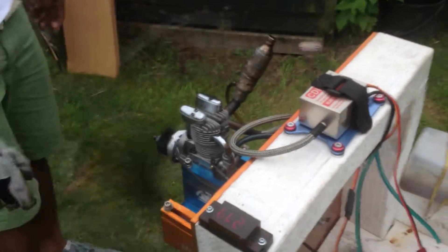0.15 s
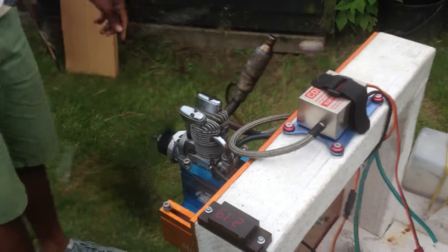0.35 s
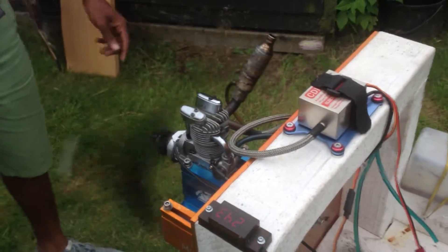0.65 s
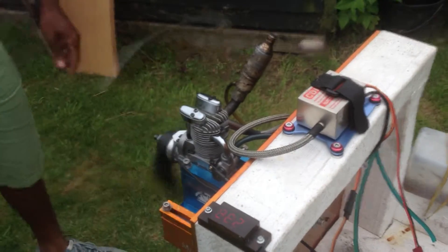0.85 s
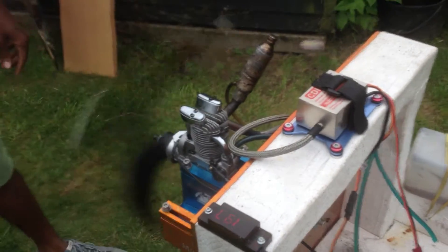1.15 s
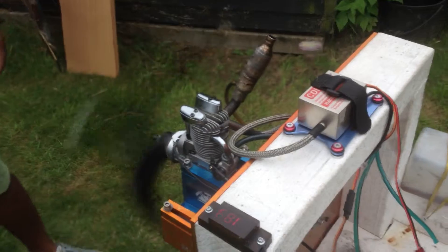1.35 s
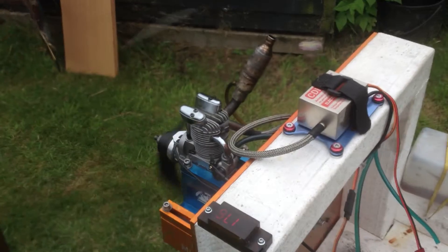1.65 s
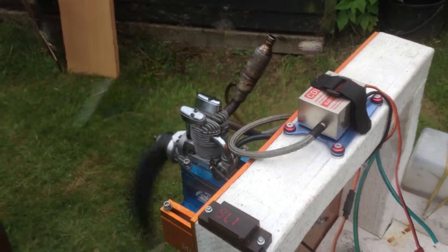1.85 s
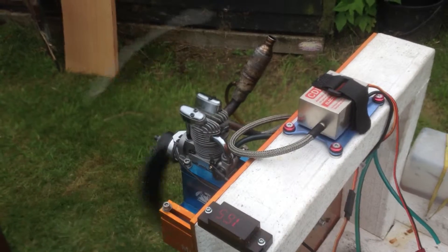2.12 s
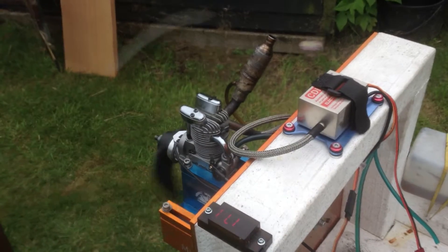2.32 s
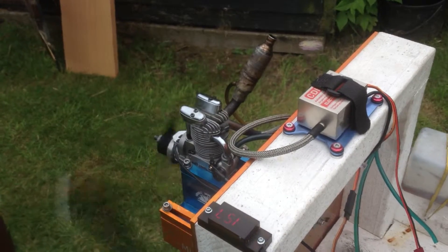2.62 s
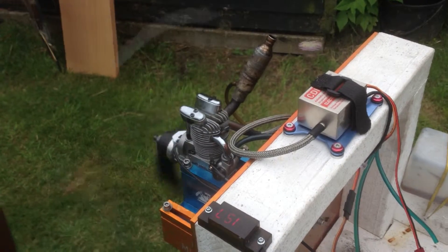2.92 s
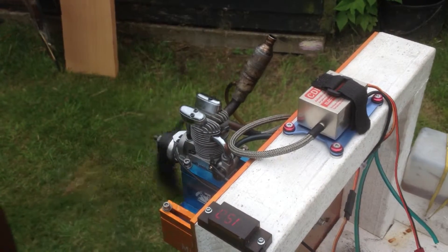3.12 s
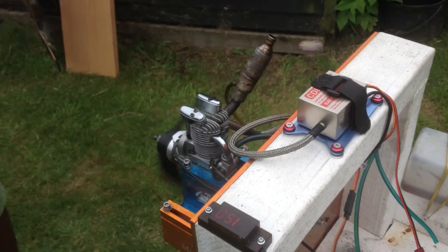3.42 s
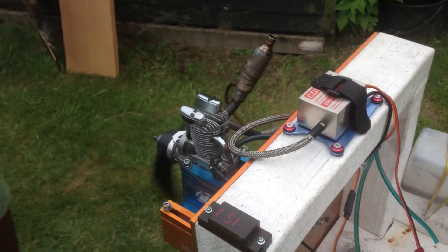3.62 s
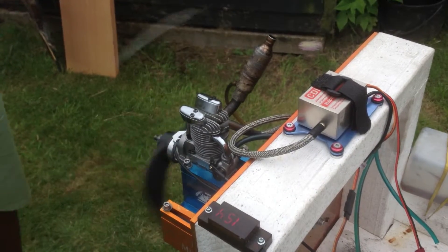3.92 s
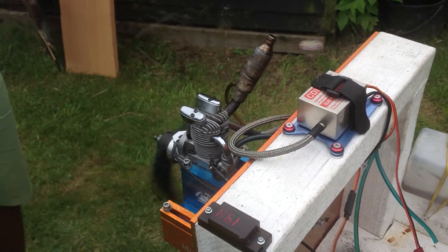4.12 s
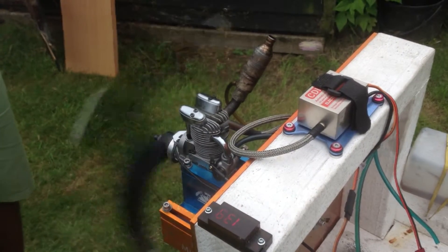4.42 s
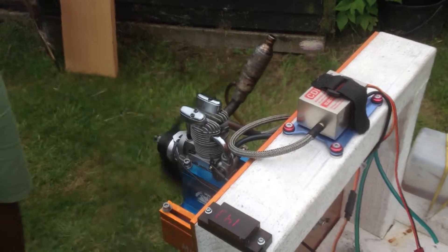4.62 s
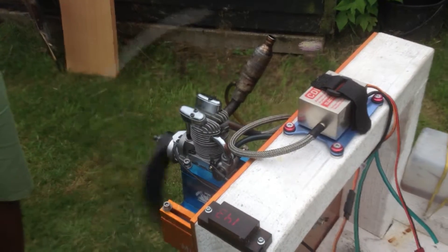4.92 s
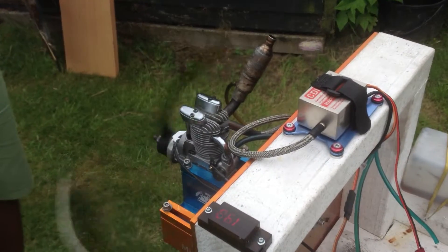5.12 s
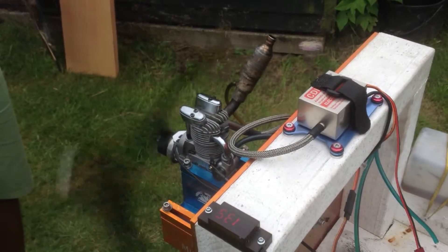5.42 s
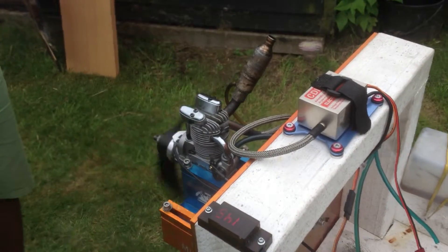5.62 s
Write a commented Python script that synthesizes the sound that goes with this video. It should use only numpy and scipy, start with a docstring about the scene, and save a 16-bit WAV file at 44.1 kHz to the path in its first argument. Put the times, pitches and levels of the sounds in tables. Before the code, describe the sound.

A small four-stroke model engine with a propeller runs on a garden stand, very close to the microphone. It begins already firing quickly for about a third of a second, then drops to a slow idle of separate hollow putts, gradually slowing further. Valve gear ticks between firings, the intake gulps softly, and propeller wash rumbles and thumps irregularly on the microphone.

```python
"""A small single-cylinder four-stroke model engine putts close to the microphone on a garden test stand.
After a short fast run it drops to a very slow idle: every firing sends a pulse through the exhaust tones,
with a pop, hiss and rush of noise, and the intake gulps half a cycle later. Valve gear ticks and rings
the metal parts. Filtered noise makes the stirred air and the gusts of propeller wash; short pulses make
thumps, one close pair probably a backfire. Faint echoes of the engine come back from the garden."""
import sys
import numpy as np
from scipy import signal
from scipy.fft import rfft, irfft
from scipy.io import wavfile
from scipy.ndimage import uniform_filter1d

SR = 44100
rng = np.random.default_rng(int(sys.argv[2]) if len(sys.argv) > 2 else 0)


def store_pcm(level_fs):
    """Save levels as 16-bit WAV."""
    pcm = np.round(np.clip(level_fs, -1, 1) * 32767).astype(np.int16)
    wavfile.write(sys.argv[1], SR, np.atleast_2d(pcm).T)


N = 254016  # length in samples
TIME = np.arange(N) / SR
TOP_HZ = 15350  # highest pitch that gets through
IDLE_CYCLE_S = 0.15  # time between firings that counts as speed 1


def undb(db):
    """Turn decibels into a plain multiplier."""
    return 10 ** (np.asarray(db) / 20)


def unit(x):
    """Scale a sound to an average strength (rms) of 1."""
    return x / np.sqrt(np.mean(x ** 2))


def even_out(x, window_s):
    """Divide a sound by its own strength over a short window, so that its level stays steady."""
    return x / np.sqrt(uniform_filter1d(x ** 2, int(window_s * SR)))


def add(out, s, sound):
    """Mix a sound in from time s on."""
    start = int(s * SR)
    lo, hi = max(start, 0), min(start + len(sound), N)
    if hi > lo:
        out[lo:hi] += sound[lo - start:hi - start]


def noise(spectrum):
    """Random noise of rms 1, coloured by a table of f/Hz, level/dB."""
    hz, db = np.transpose(spectrum)
    bins = np.arange(N // 2 + 1) * SR / N
    colour_db = np.interp(np.log(bins + 1), np.log(hz), db)
    return unit(irfft(rfft(rng.standard_normal(N)) * undb(colour_db), N))


def resonate(x, modes):
    """Let a sound excite several tones at once: f/Hz, width/Hz, level/dB."""
    out = 0
    for hz, width, db in modes:
        out = out + undb(db) * signal.lfilter(*signal.iirpeak(hz, hz / width, SR), x)
    return out


def low_cut(x, hz):
    """Thin out what lies below hz (second-order high-pass)."""
    return signal.sosfilt(signal.butter(2, hz, "high", fs=SR, output="sos"), x)


def walk(rate):
    """Smooth random wander with a spread of 1, taking a new value `rate` times a second."""
    k = int(SR / rate)
    steps = np.repeat(rng.standard_normal(N // k + 1), k)
    return unit(uniform_filter1d(steps, k)[:N])


def bumps(times, sizes, widths):
    """Bell-shaped pulses centred on the given times; widths in s."""
    out = np.zeros(N)
    for s, size, width in np.broadcast(times, sizes, widths):
        lo, hi = np.searchsorted(TIME, [s - 6 * width, s + 6 * width])
        out[lo:hi] += size * np.exp(-((TIME[lo:hi] - s) / width) ** 2 / 2)
    return out


def decays(times, sizes, decay_s):
    """Envelopes that jump up at the given times and die away."""
    out = np.zeros(N)
    shape = np.exp(-np.arange(int(8 * decay_s * SR)) / (decay_s * SR))
    for s, size in zip(times, sizes):
        add(out, s, size * shape)
    return out


def by_speed(law, speed):
    """Level in dB of a sound that grows with crank speed."""
    idle_db, doubling_db = law
    return idle_db + doubling_db * np.log2(speed)


# tones of the exhaust pipe: f/Hz, width/Hz, level/dB
EXHAUST_TONES = [(181.2, 57.5, -3), (299.3, 106.4, -0.5), (518.8, 40, -9), (1334, 1220, -5.5)]
# colour of the rush of burnt gas: f/Hz, level/dB
RUSH_COLOUR = [(150, -32), (350, -6), (600, 1), (900, 1), (1250, -5), (1700, -22), (3000, -22),
               (8000, -40.5)]
# starting level of the exhaust pulse: at idle level/dB, more per doubling of speed level/dB
PULSE_LAW = (-19, 2.08)
# starting level of the gas hiss: at idle level/dB, more per doubling of speed level/dB
HISS_LAW = (-45.5, 0.38)


def exhaust(times, periods, firing_speed):
    """The valve cracks open with a pop, gas hisses through the gap, then the main pulse leaves the pipe."""
    level_chance = rng.standard_normal((len(times), 2)).T  # no two cycles burn alike
    pulse_db = by_speed(PULSE_LAW, firing_speed) + 0.5 * level_chance[0]
    hiss_db = by_speed(HISS_LAW, firing_speed) + 1.2 * level_chance[1]
    lead = 0.002728 + 0.0127 * periods  # a slow crank opens the valve more slowly
    chance = rng.standard_normal((len(times), 2)).T
    pulses = bumps(times, undb(pulse_db + 9.5), 0.00039 * np.exp(0.025 * chance[0]))
    putt = resonate(pulses, EXHAUST_TONES)
    cracks = bumps(times - lead, undb(pulse_db - 2.5), 0.00013)
    pop = resonate(cracks, [(550, 300, 1.5), (1410, 180, -21)])
    # the burnt gas follows as a turbulent rush, stronger at speed
    flow = undb(pulse_db - 23.5) * (IDLE_CYCLE_S / periods) ** 0.44
    rush_shape = uniform_filter1d(decays(times, flow, 0.0069), int(0.009 * SR))
    rush = rush_shape * noise(RUSH_COLOUR)
    # the kick of each firing sets the stand humming a moment later
    kicks = bumps(times + 0.008445 + 0.00035 * chance[1], undb(pulse_db + 11), 0.00059)
    stand = resonate(kicks, [(581.7, 38, 1.0), (381.0, 18, -22.0)])
    pipe = putt + pop + rush + stand + jet(times, lead, hiss_db)
    return low_cut(pipe, hz=141)  # so small a pipe radiates little bass


# basic colour of the squeezed gas: f/Hz, level/dB
GAS_COLOUR = [(800, 7.5), (1800, 17), (2600, 1.5), (3500, 8.5), (5000, -4), (7000, 1), (9000, -0.5),
              (11000, -2), (14500, 8)]


def jet(times, lead, hiss_db):
    """Gas squeezed through the barely open valve hisses, each time with its own shrill colour."""
    out, size = np.zeros(N), 1024
    t = (np.arange(size) - size / 2) / SR
    hz = np.fft.rfftfreq(size, 1 / SR)
    gas_hz, gas_db = np.transpose(GAS_COLOUR)
    for s, gap, db in zip(times, lead, hiss_db):
        chance = rng.standard_normal(size=20)
        own_colour = np.interp(hz, np.linspace(0, SR / 2, len(chance)), chance)
        colour_db = np.interp(hz, gas_hz, gas_db) + 3 * own_colour
        gas = unit(irfft(rfft(rng.standard_normal(size)) * undb(colour_db) * (hz < TOP_HZ)))
        # a sharp peak on a weaker, longer spread; silent until half the gap before the peak
        squeeze = np.exp(-np.abs(t) / 0.00096) + undb(-16.5) * np.exp(-np.abs(t) / 0.0079)
        add(out, s - 0.5 * gap + t[0], undb(db + 1.5) * gas * squeeze * (t > -0.5 * gap))
    return out


# colour of the rushing intake air: f/Hz, level/dB
GULP_COLOUR = [(60, -24), (130, -2.5), (200, 9.5), (320, 13), (450, -2), (800, -10), (1300, -21.5),
               (2500, -69)]
# starting level of the gulp: at idle level/dB, more per doubling of speed level/dB
GULP_LAW = (-39.5, 3.5)


def intake(times, periods, firing_speed):
    """Half a cycle after each firing the carburettor gulps air: a soft suck and a short rush."""
    gulp_db = by_speed(GULP_LAW, firing_speed) + 2.0 * rng.standard_normal(len(times))
    at = times + periods * (0.48 + 0.0093 * rng.standard_normal(len(times)))
    pulls = bumps(at, -undb(gulp_db + 14), 0.00063)  # suction, so the pulses point downwards
    suck = resonate(pulls, [(163.6, 30, -0.98), (335.0, 42, -1.3)])
    rush = even_out(noise(GULP_COLOUR), 0.017)  # each gulp keeps its own strength
    return suck + bumps(at, undb(gulp_db - 0.5), 0.032 * periods) * rush


# knocks of valve gear and piston in every cycle: share of the cycle after the firing, level/dB
KNOCKS = [(.08, 1), (0.147, 8), (0.257, 6), (0.418, 7.5), (0.554, 0.5), (0.627, 5.5), (0.763, 4)]
# ringing of cylinder, rockers and stand: f/Hz, width/Hz, level/dB
METAL_TONES = [(603, 35, 11), (950, 140, -15), (1205, 22.5, 7.5), (1492, 35, -2.5), (2036, 77, 0.3),
               (2354, 41, 2), (2690, 24, -16.5), (3060, 160, -13.5), (5240, 1300, -17.5), (7800, 84, -24)]
# colour of the rubbing parts: f/Hz, level/dB
RUB_COLOUR = [(200, 10), (600, 17.5), (1200, 4.5), (2400, 1.5), (2900, -18.5), (5500, -10), (8000, -29),
              (10500, -52), (14500, -20)]
# colour of the oiled surfaces: f/Hz, level/dB
OIL_COLOUR = [(1000, 0), (6500, -4.5), (10500, -8), (14500, -3)]
# overall level of knocks and rubbing: at idle level/dB, more per doubling of speed level/dB
CLATTER_LAW = (-60.5, 3.8)


def mechanism(times, periods, speed):
    """Knocks at nearly fixed crank angles ring the metal; cams and piston rub twice a cycle."""
    share, knock_db = np.transpose(KNOCKS)
    chance = rng.standard_normal((len(times), 2, len(KNOCKS)))
    at = times[:, None] + periods[:, None] * (share + 0.008 * chance[:, 0])
    blows = bumps(at.ravel(), undb(knock_db + 1.3 * chance[:, 1]).ravel(), 0.00003)
    blows /= np.sqrt(speed)  # crowded knocks share their energy
    ring = unit(resonate(blows, [mode for mode in METAL_TONES if mode[0] > 1000]))
    # count of cycles so far, with the part after the point showing how far the current one has got
    cycle = np.interp(TIME, np.append(times, times[-1] + periods[-1]), np.arange(len(times) + 1))
    # compression slows the crank, so the rubbing falls quiet just before each firing
    hush_db = -5 * np.exp(-((cycle % 1 - 0.91) / 0.07) ** 2)
    sliding = undb(hush_db + 2.5 * np.cos(4 * np.pi * (cycle - 0.16)) + 2.3 * walk(200))
    rubbed_metal = unit(resonate(rng.standard_normal(N), METAL_TONES))
    rub = sliding * (noise(RUB_COLOUR) + undb(-9) * rubbed_metal)
    # fine hiss of oiled surfaces
    oil = undb(-74.6 + 3.6 * np.cos(4 * np.pi * (cycle - 0.19))) * noise(OIL_COLOUR)
    return undb(by_speed(CLATTER_LAW, speed)) * (undb(-5.0) * ring + rub) + oil


def crank_speed(times, periods):
    """Speed as a multiple of idle; the heavy propeller makes it lag behind the firing rate."""
    coast_s = 0.44  # time constant of the lag
    rate = np.interp(TIME, times, IDLE_CYCLE_S / periods)
    keep = np.exp(-1 / (coast_s * SR))
    return rate[0] + signal.lfilter([1 - keep], [1, -keep], rate - rate[0])


# gusts of propeller wash on the microphone: start t/s, strongest t/s, end t/s, level/dB
GUSTS = [(0.288, 0.427, 0.56, -28.5), (0.633, 0.63, 0.93, -35), (1.856, 2, 2.22, -32.5),
         (2.3, 2.32, 2.51, -32), (2.795, 2.997, 3.19, -35.5), (3.24, 3.272, 3.6, -39.5),
         (4.922, 5.04, 5.08, -39), (5.242, 5.282, 5.64, -44.5), (5.672, 5.674, 5.8, -33.5)]
# large eddies that thump the microphone; the close pair near 0.83 s is probably a backfire
# through the carburettor: t/s, level/dB, half width t/s
THUMPS = [(0.3214, -12.5, 0.00048), (0.3912, -16, 0.00044), (.433, -17, 0.00034), (0.454, -18, 0.00031),
          (0.826, -12.5, 0.00045), (0.8299, -12.5, 0.00023), (1.971, -20.5, 0.00044),
          (2.3098, -10, 0.00044), (2.449, -15, 0.0015), (2.465, -20, 0.00043), (3.265, -18, .0006),
          (4.9894, -13, 0.00042), (5.052, -17, 0.00074), (5.2689, -11.5, 0.00069), (5.6811, -13, 0.0013)]
# colour of the rumble in a gust: f/Hz, level/dB
WASH_COLOUR = [(30, -67), (60, -51), (100, -10.5), (160, 3), (250, 1), (350, -12.5), (500, -13),
               (800, -30.5), (1500, -42.5), (4000, -65)]
# tones of the flutter and the thumps, the microphone's response to an eddy: f/Hz, width/Hz, level/dB
THUMP_TONES = [(153, 7, -12), (188.5, 44, -6), (281, 294, 0), (685, 1100, -8)]


def wash_and_thumps():
    """Propeller gusts rumble and flutter; large eddies, and probably one backfire, give single thumps."""
    eddies_per_s = 110
    strength = np.zeros(N)
    for start, top, end, db in GUSTS:
        # the square root gives a gust a broad top
        strength += undb(db) * np.interp(TIME, [start, top, end], [0, 1, 0]) ** 0.5
    rumble = even_out(noise(WASH_COLOUR), 0.035)  # each gust keeps its own strength
    chance = rng.random((int(eddies_per_s * N / SR), 2)).T
    at = (np.arange(len(chance[0])) + chance[0]) / eddies_per_s
    flutter = unit(resonate(bumps(at, 2 * chance[1] - 1, 0.00071), THUMP_TONES))
    gusts = strength * (undb(-4.5) * rumble * undb(3.8 * walk(90)) + undb(-4) * flutter)
    times, db, widths = np.transpose(THUMPS)
    thumps = resonate(bumps(times, undb(db), widths), THUMP_TONES)  # wide pulses give deeper thumps
    return gusts + low_cut(thumps, hz=86)


# colour of the stirred air: f/Hz, level/dB
AIR_COLOUR = [(25, 11), (60, -3), (130, 8), (250, 8), (500, -22), (1000, -10.5), (2000, -21.5), (4000, -30),
              (10000, -48)]
# level of the stirred air: at idle level/dB, more per doubling of speed level/dB
AIR_LAW = (-52.5, 4.2)


def stirred_air(speed):
    """A faster propeller stirs more air: steady noise that grows with speed and wanders a little."""
    return undb(by_speed(AIR_LAW, speed) + 1.8 * walk(15)) * noise(AIR_COLOUR)


def garden(x, wet_db, decay_s):
    """Weak scattered echoes from the fence, the stand and the ground: a fading burst of random reflections."""
    t = TIME[:SR // 4]
    echoes = rng.standard_normal(len(t)) * np.exp(-t / decay_s) * (t > 0.008)
    return x + undb(wet_db) * signal.fftconvolve(x, echoes / np.linalg.norm(echoes))[:N]


# moments of the firings, a short fast run and then the slow idle: t/s
FIRINGS = [0.0234, 0.0655, 0.109, 0.149, 0.1886, 0.2261, 0.2643, 0.3424, 0.4703, 0.5712, 0.6752, 0.7791,
           0.8908, 1.0062, 1.131, 1.2613, 1.3962, 1.5344, 1.6695, 1.8045, 1.9438, 2.0952, 2.2333, 2.3821,
           2.5379, 2.6893, 2.8381, 3, 3.1483, 3.309, 3.4688, 3.627, 3.7867, 3.9434, 4.1106, 4.2651, 4.4394,
           4.6078, 4.775, 4.9453, 5.1082, 5.2926, 5.459, 5.6209]


def scene():
    """The engine in the garden, with the stir of air, the propeller's gusts and the thumps."""
    times = np.array(FIRINGS)
    periods = np.append(np.diff(times), times[-1] - times[-2])
    speed = crank_speed(times, periods)
    firing_speed = np.interp(times, TIME, speed)
    engine = exhaust(times, periods, firing_speed)
    engine = engine + intake(times, periods, firing_speed)
    engine = engine + mechanism(times, periods, speed)
    mix = garden(engine, wet_db=-19.0, decay_s=0.024) + stirred_air(speed) + wash_and_thumps()
    return mix[None]


def record(dry):
    """The recorder thins the deep bass and cuts the top steeply."""
    top_cut = signal.ellip(10, 0.2, 70, TOP_HZ, fs=SR, output="sos")
    return signal.sosfilt(top_cut, low_cut(dry, hz=79.0))


dry = scene()
out = record(dry)
store_pcm(out)
```